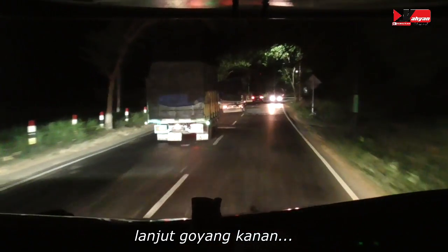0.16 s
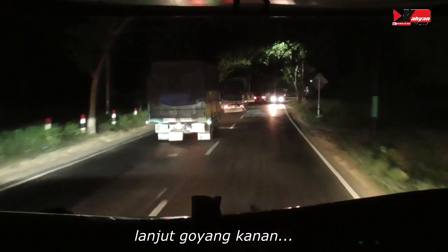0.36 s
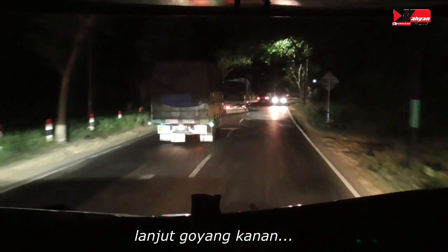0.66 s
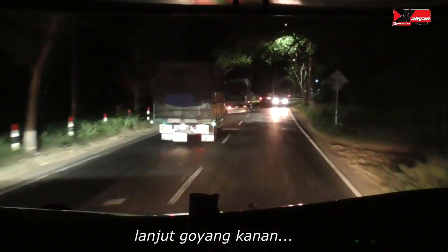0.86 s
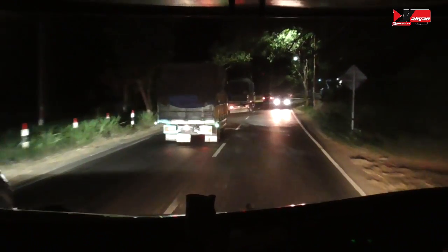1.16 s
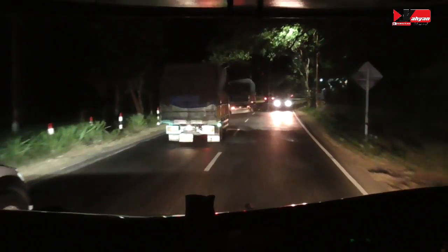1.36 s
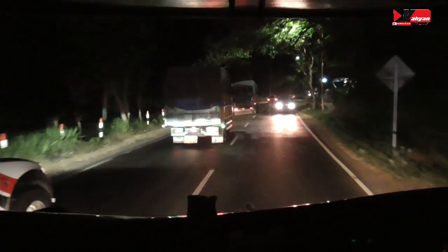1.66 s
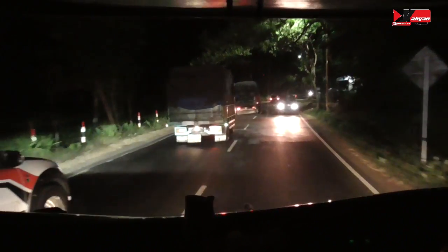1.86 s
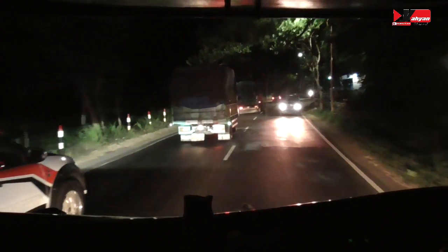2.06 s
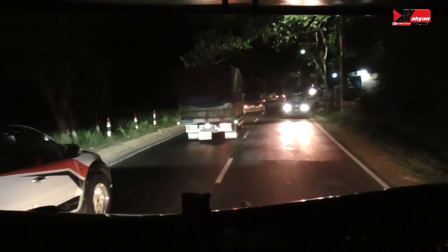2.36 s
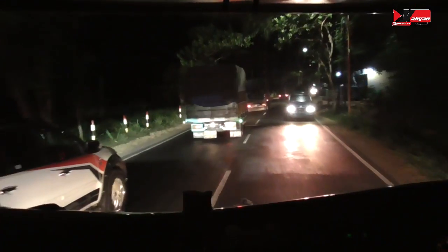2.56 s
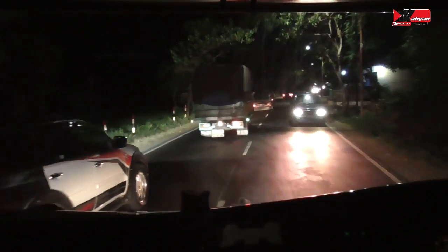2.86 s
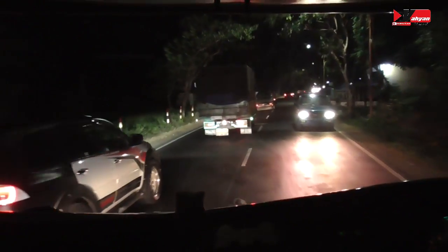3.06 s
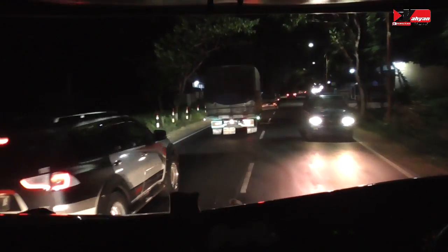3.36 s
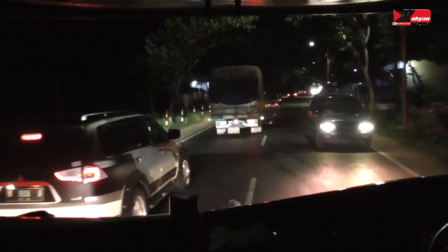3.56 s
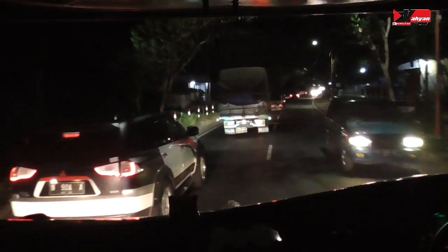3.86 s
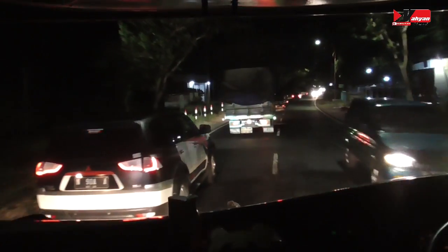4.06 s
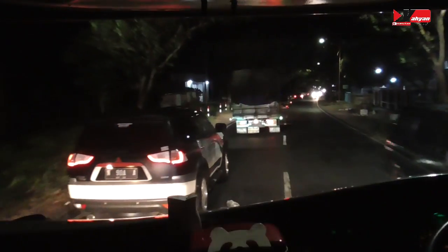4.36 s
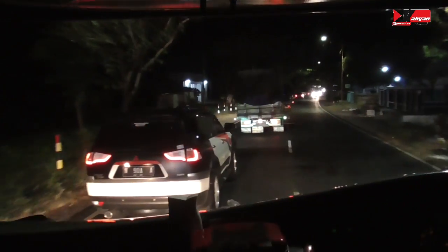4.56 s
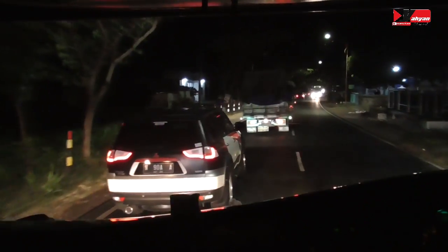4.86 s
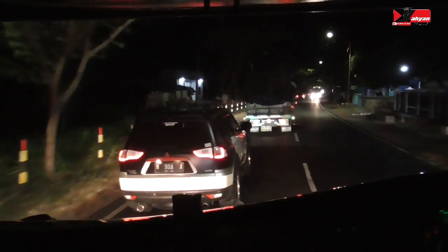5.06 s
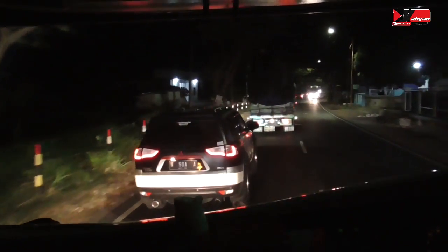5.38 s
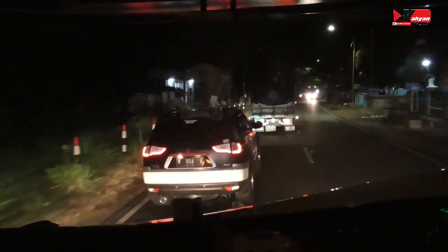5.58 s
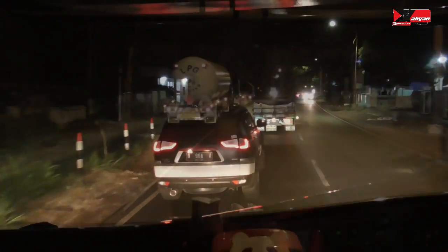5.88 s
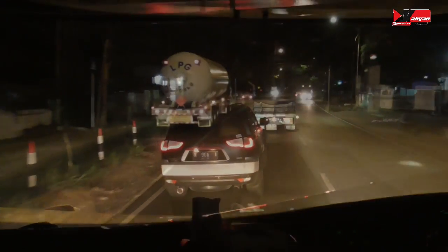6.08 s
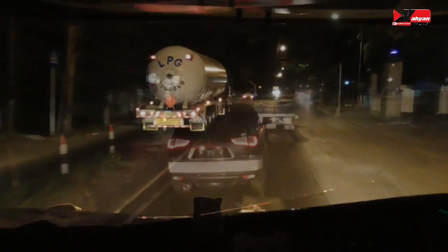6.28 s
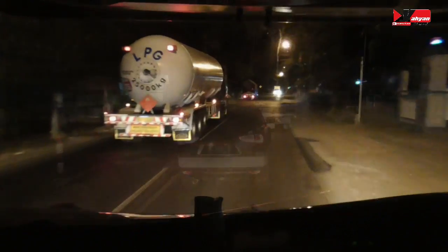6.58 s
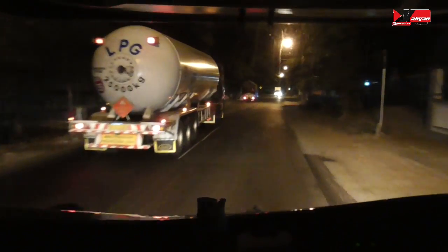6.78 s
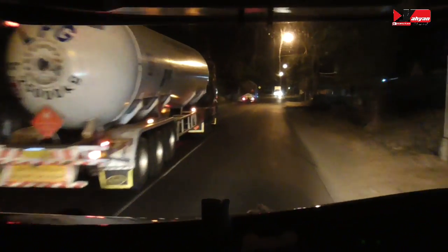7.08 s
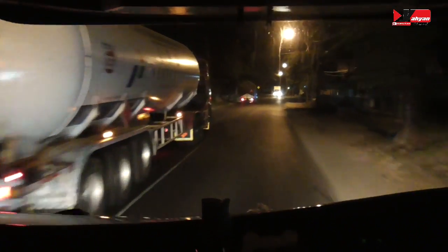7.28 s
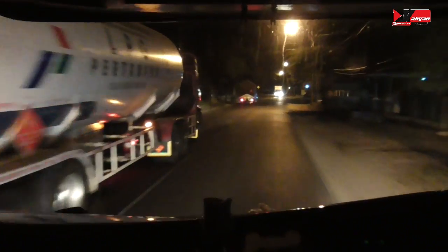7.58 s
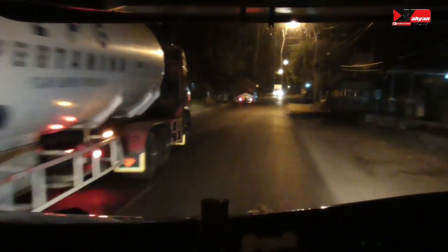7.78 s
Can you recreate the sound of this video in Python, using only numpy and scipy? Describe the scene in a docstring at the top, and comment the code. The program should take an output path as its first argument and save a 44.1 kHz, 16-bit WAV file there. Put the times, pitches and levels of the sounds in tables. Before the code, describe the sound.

Inside a large diesel coach moving at night, close to the microphone in the cab. A dark, heavy bed of road rumble and tyre roar runs throughout, with faint wavering engine and driveline hums and thin air hiss. An indicator relay clicks brightly from 0.25 s, roughly every 0.63 s to the end, with a much softer tock between clicks. Soft panel creaks and low floor booms occur in the first second; light trim knocks come near 1.7 s. The roar eases slightly from 2.5 to 4.3 s, with cloth rustles and small dry snaps around 3.5 and 4.5 s. Stronger rattles hit at 4.9 and 5.2 s, then more snaps. From 5.9 s the road noise swells, fullest around 7 to 7.4 s, with deep booms and frequent rattles, easing a little before it stops at 7.9 s, still under way.

```python
"""Road roar fills the cab of a coach at night: noise shaped by how hard the road shakes the floor.
The road roar grows louder towards the end. Gliding tones make the engine and driveline hum.
The indicator relay ticks and tocks by ringing its case; floor panels boom on single low notes.
Trim rattles, creaks and snaps are short knocks and rings spread by random cab reflections.
Air leaking past the seals and rustling cloth add fine, bright noise."""
import sys
import numpy as np
from scipy import signal
from scipy.fft import rfft, irfft
from scipy.io import wavfile
from scipy.ndimage import uniform_filter1d

SR = 44100
rng = np.random.default_rng(int(sys.argv[2]) if len(sys.argv) > 2 else 0)


def digitize_waveform(pressure):
    """Quantize a signal to 16-bit integers and store it at the path in sys.argv[1].

    Rows of a 2-D input are taken as channels; values are limited to [-1, 1].
    """
    field = np.atleast_2d(pressure).T
    bounded = np.clip(field, -1, 1)
    quanta = np.round(bounded * 32767).astype(np.int16)
    wavfile.write(sys.argv[1], SR, quanta)


N = 349713  # length in samples

# In all tables level_db is relative: a function may add a level shift for its whole layer.
# pan_db is left minus right.

# How hard the road shakes the floor: time_s, level_db
ROAD_SHAKING = [(0, 0.5), (.5, -1.5), (1.8, -2), (2.6, -3.5), (3.6, -4), (4.25, -3.5), (4.6, -1.5),
                (5.4, -2), (5.9, 2), (6.45, 5.5), (6.7, 6), (7, 7), (7.35, 7.5), (7.7, 6), (7.93, 4.5)]
# Tone colour of the road roar: pitch_hz, level_db (per Hz)
ROAR_COLOUR = [(8.8, -48.5), (15, -6), (49, -7), (121, -2), (224, -1.5), (256, -4), (293, -4.5),
               (357, -11.5), (399, -12.5), (679, -18), (886, -22.5), (969, -25.5), (1240, -28.5),
               (1500, -35.5), (1720, -45), (2100, -44.5), (3000, -62), (3900, -47), (6600, -120)]
# Bands lifted by the cab: pitch_hz, width_hz, lift_db
CAB_LIFTS = [(132.3, 63, 5), (163, 42, -1.5), (215, 18.4, 1.5), (466, 21, 3.5), (888, 146, 4)]
# Brief lifts and dips of the road roar and rumble: time_s, roar_lift_db, rumble_lift_db
ROAD_LIFTS = [(1.9, 14, 1), (4.55, 1, 4), (5.15, 5, 2.5), (6.4, -1, 3), (6.76, 10, -0.5), (6.96, 14, -0.5),
              (7.37, -14, -4)]
# Rumble against the shaking, and extra for its deepest part: time_s, level_db, deep_db
RUMBLE = [(0, 2, -8), (.9, 1.5, 0), (1.3, -1.5, -1), (2, 2, -3), (3, -4, 5), (3.9, -2.5, 3), (4.6, 1.5, -2),
          (5.4, -2, 5), (5.8, 2, -1), (6.7, -3.5, 2), (7.3, 1.5, -2), (7.93, -2, 4)]
# How strongly the wash (upper road noise) follows the shaking: pitch_hz, follow_db (per dB)
WASH_FOLLOWS = [(150, 1), (280, 0.83), (450, 1.19), (850, 0.91), (1300, 0.9), (2200, 1.22)]
# Surges and dips of the wash: time_s, lift_db
SURGES = [(5.95, 0.5), (6.15, -0.5), (6.66, 0), (6.82, -2.5), (6.93, 2), (7.2, -1.5), (7.45, 1.5),
          (7.6, -2.5), (7.72, 1.5), (7.81, -1)]
ROAR_FOLLOWS, RUMBLE_FOLLOWS, HISS_FOLLOWS = 0.88, 1, 0.69  # dB per dB of shaking
ROAR_LUMPS_DB, RUMBLE_LUMPS_DB, WASH_LUMPS_DB = -0.6, 1.6, 1.0  # random unevenness
ROAD_LIFT_S, SURGE_S = 0.053, 0.039  # time from the peak until the lift is down to 1/e

# Likeness of left and right noise: pitch_hz, likeness (1 is identical)
SAME = [(60, 0.92), (150, 1), (380, 0.88), (950, 0.72), (2380, 0.37), (5980, -0.21), (15000, -0.063)]
# Left-right balance of the noise: pitch_hz, pan_db
LEAN = [(60, 0), (180, -2), (550, -2.5), (1650, -1.5), (4970, 0), (15000, -3.5)]
# How far the left noise leads the right: pitch_hz, lead_rad
LEAD = [(0, 0), (2840, 0.0), (3700, -1.2), (6460, -4.5), (8960, -8), (11400, 0.5), (15200, -15)]

# Tone colour of the hiss: pitch_hz, level_db (per Hz)
HISS_COLOUR = [(900, -4), (1500, -5.5), (2300, -3), (2800, -6.5), (4500, -3), (5800, -7.5), (8000, -2),
               (11000, -3), (12800, -6), (14200, -11), (15200, -17), (15700, -30)]
# Cloth rustling: start_s, length_s, level_db, extra_below_crossover_db
RUSTLES = [(0, 0.13, -54, 2), (0.298, 0.18, -57, 2), (1.06, 0.32, -51, -4), (1.552, 0.4, -53, -2.5),
           (1.758, 0.32, -54, 3.5), (2.052, 0.22, -58, 2), (2.507, 0.46, -60.5, 6.5), (2.8, 0.57, -57, 5),
           (3.19, 0.72, -56, 5.5), (3.727, 0.55, -56, 3.5), (4.7, 0.77, -63.5, 12), (5.697, 0.44, -61.5, 9),
           (6.1, 0.37, -53.5, 4), (6.37, 0.29, -50, 6.5), (6.833, 0.38, -52, 3.5), (7.263, 0.38, -56.5, 8),
           (7.546, 0.41, -60.5, 4)]
SEALS_DB, SEALS_LOW_DB = -60, 6.5  # leaking air, and its extra below the crossover
RUSTLE_EDGE_S, CROSSOVER_HZ = 0.12, 5000

# Gliding engine whine: time_s, pitch_hz, level_db
ENGINE = [(0, 297.8, -8), (.35, 285, -36), (.45, 280, -44), (.6, 274.2, -33.5), (.95, 262, -39),
          (1.15, 258, -32.5), (1.4, 272, -40), (1.749, 297, -30.5), (1.902, 303, -37.5), (2.2, 308, -47),
          (2.499, 303.8, -48), (2.7, 302, -38.5), (2.9, 301, -45), (3.1, 300, -29.5), (3.3, 301, -41),
          (3.6, 303, -37), (3.7, 305, -40), (3.8, 309.4, -37.5), (4.2, 316.6, -37.5), (4.402, 289, -33),
          (4.65, 255.4, -42), (4.85, 238, -52), (5, 226, -32), (5.2, 207.7, -48)]
# Driveline hums, one list each, gliding from point to point: time_s, pitch_hz, level_db
HUMS = [
    [(0.76, 124.2, -21), (1.02, 127.7, -28.5), (1.1, 129.2, -25), (1.7, 126, -25), (1.95, 121.6, -29),
     (2.06, 115, -31), (2.22, 122, -28.5), (2.35, 113.7, -27.5), (2.5, 117.9, -27.5), (2.7, 118, -31),
     (2.92, 118, -27), (3.15, 114.3, -34.5)],
    [(3.05, 120.2, -37), (4.2, 121.6, -36), (5.2, 123.7, -33.5), (6.6, 125.2, -39)],
    [(2.4, 196.8, -32.5), (4, 199.4, -35)],
    [(4.7, 288.3, -35), (5.3, 287.3, -35.5), (5.45, 287, -29), (5.8, 286.5, -32.5), (5.92, 285.4, -34),
     (6.1, 286.8, -37.5), (6.4, 285, -28.5), (6.7, 285, -42)],
    [(6.1, 222, -37.5), (7.93, 225.4, -29)],
    [(0, 896, -54), (4.5, 907, -53.5)],
    [(.5, 223.4, -42), (2.35, 222.1, -38.5)],
    [(1.75, 112.4, -36), (2.3, 112.5, -32.5), (2.75, 111.8, -31)],
    [(3.3, 2320, -70), (3.6, 2355, -72), (4.2, 2310, -71)],
]
# Unsteadiness of each driveline hum: pitch_waver_share, throb_db
UNSTEADY = [(0.0052, 1.5), (0.011, 3), (0.0027, 0.5), (0.004, 2.5), (0.0078, 3), (0.01122, 4), (0.0089, 2),
            (.004, -0.5), (0.0099, 6.5)]

# Soft creaks of the body panels: start_s, peak_db, panel_name
CREAKS = [(0, -45, "high"), (0.244, -37, "low"), (.36, -40.5, "high"), (.465, -36.5, "low"),
          (.575, -43, "low"), (.9, -39, "low"), (.9, -48, "top"), (1.16, -48, "high"), (1.85, -52, "high"),
          (1.939, -54, "high"), (6.53, -44, "high"), (7.42, -35, "low")]
# What each creaking panel rings with, by name: pitch_hz, width_hz, t60_s (time to fall 60 dB)
PANELS = {"low": (1304, 100, 0.055), "top": (1970, 120, .06), "high": (1770, 580, 0.36)}

# Brief booms of the floor: peak_s, level_db, pitch_hz
BOOMS = [(.1, -23.5, 144), (0.177, -25.5, 232), (0.602, -21.5, 139.2), (0.718, -25.5, 135),
         (0.578, -24, 114.7), (4.151, -30, 119), (4.378, -26.5, 113), (4.579, -24, 122.5),
         (4.809, -25, 126.8), (5, -29, 127.8), (5.521, -30, 122), (5.721, -29, 123.6), (6.01, -24.5, 130.8),
         (6.43, -20, 225), (6.497, -26, 122.3), (6.66, -24, 226.6), (7, -19, 226), (7.05, -18, 123),
         (7.3, -21.5, 137), (7.299, -23.5, 171), (7.401, -20, 78), (7.881, -25.5, 231)]
BOOM_S = 0.073  # time from the peak until the boom is down to 1/e

# Knocks of loose trim: time_s, level_db, low_part_db (below about 6.7 kHz),
# body_db (dull body near 740 Hz), pan_db, t60_s
RATTLES = [(0.242, -39, 6, -10, 2, .1), (.4638, -44, 4, -6, -2, .1), (1.1308, -43, -16, -12, -2, 0.11),
           (1.6665, -34.5, -6, -6, -1, 0.14), (1.6824, -37, -10, -19, -3, 0.17),
           (3.062, -40, -3, -10, -1, 0.36), (3.14, -45, 8, -12, 0, .1), (3.465, -42, 8, -10, 0, .12),
           (3.563, -41, 7, -10, 0, .08), (3.605, -45, 6, -10, 0, 0.068), (3.648, -42, 7, -8, 0, .1),
           (3.81, -47, 7, -10, 0, .1), (3.948, -39, 10, -8, 0, 0.1), (4.0831, -40.5, -17, -14, -2.5, 0.1),
           (4.9188, -24.5, -0.5, -4, -2, 0.18), (5.1, -46, -8, -12, 0, .1), (5.1776, -25, -2, -12, 0, 0.14),
           (5.1834, -23.5, -3, -3, -3, 0.19), (5.375, -42, 5, -2, -1, 0.22),
           (5.728, -34.5, -7, -13, -1, 0.28), (5.7616, -35, 5, -1, -2, 0.095),
           (5.9431, -31, -8, -7, 1, 0.15), (6.1236, -32, -11, 0, -1, 0.23),
           (6.2857, -25, -18, -9, -2, 0.076), (6.659, -40, 0, 6, 1, 0.17), (6.913, -38, -17, -6, .5, 0.16),
           (7.0499, -34, -3, 4.5, -1, 0.071), (7.208, -42, -15, 3, -1, 0.24),
           (7.263, -34.5, -2, -2, -1, .12), (7.3744, -37.5, -6, 10, -2, 0.38), (7.668, -43, -10, 1, 2, .3),
           (7.8635, -41, -4.5, -5, -1, .17)]
# Tone colour of the loose trim: pitch_hz, level_db (per Hz)
TRIM_COLOUR = [(1470, -37), (2500, -9), (3140, -5), (3450, 1), (5200, -6), (8170, -2.5), (12200, -8.5),
               (14600, -18), (15500, -39)]

# The relay closes; two closings overlap near 5.87 s: time_s, level_db, pan_db
TICKS = [(.2548, -29, -2), (.880, -28, -3), (1.506, -27, -1), (2.130, -26.5, 0), (2.755, -28, -3),
         (3.38, -27.5, -2), (4.005, -26, -2), (4.63, -28, -1), (5.255, -26.5, -2), (5.861, -33.5, -8),
         (5.880, -29.5, -2), (6.485, -26, -2), (7.107, -29, -4), (7.732, -30.5, -6)]
# The relay opens in between: time_s, level_db
TOCKS = [(0.579, -46.5), (1.205, -47), (1.8298, -46.5), (2.454, -46.5), (3.0798, -47), (3.7049, -46.5),
         (4.33, -45.5), (4.954, -47), (5.5556, -46), (6.182, -50), (6.204, -49.5), (6.783, -46.5),
         (7.432, -46.5)]
# Rings of the relay case: pitch_hz, width_hz (before added damping), closing_db, opening_db
RELAY = [(3270, 90, -16, -4), (3480, 60, -8, -4), (3652, 45, 1, -9), (3750, 45, -8, 1), (3865, 60, -4, -9),
         (4030, 50, -11, -7), (4200, 55, -8, -10), (4393, 50, -5.5, -14), (4607, 50, -9, -14),
         (4867, 70, -15, -11), (2500, 60, -32, -7), (2750, 60, -33, -9), (3030, 90, -25, -11),
         (5250, 300, -23, -19), (6500, 250, -32, -7), (7250, 350, -22, -9), (8200, 700, -20, -11),
         (9700, 700, -24, -11), (11350, 500, -25, -17), (11925, 90, -21, -12), (12117, 90, -22, -10)]
# The armature chatters against its stop: delay_ms, closing_db, opening_db
CHATTER = [(0, 7, 3), (4.07, -18.5, -6), (8.09, -2, -5), (11.88, 0, -5), (16, -2, 3), (20, 3, -15),
           (23.4, -9, -8), (28.1, -2, -4), (31.9, -7, -16), (34.9, -14, -8)]
# How far the left relay sound leads the right: pitch_hz, lead_rad
RELAY_LEAD = [(0, 8), (4400, -0.7), (6400, -3), (9500, -10), (15200, -14)]
OPENING_PAN_DB, OPENING_CAB_DB = -2.5, 3.5

# Dry snaps close to the microphone: time_s, level_db, pan_db
SNAPS = [(1.2815, -36, 7), (3.548, -34, 0.0), (3.6194, -42, 4), (4.4925, -27.5, 3), (4.769, -28.5, 0.5),
         (5.1338, -31, 1), (5.3214, -37, 1), (5.4849, -38, 3), (5.64, -45, -8)]
# Tone colour of a snap: pitch_hz, level_db
SNAP_COLOUR = [(500, -20), (1500, -5), (3000, 5), (6000, -5), (10000, -5), (15500, -21)]

EDGE_HZ = 15650  # top of the recorder's range


def gain_of(db):
    """Turns decibels into a factor."""
    return 10 ** (np.asarray(db) / 20)


def evened(x):
    """Scales to an rms (average strength) of 1."""
    return x / np.sqrt(np.mean(x ** 2) + 1e-20)


def read(points, hz):
    """Reads a table of values over pitch, with straight lines on a log pitch scale."""
    f, value = np.transpose(points)
    return np.interp(np.log(hz + 1), np.log(f + 1), value)


def add(mix, s, sound, pan_db):
    """Mixes in a two-channel sound at time s, cutting whatever runs past the end."""
    part = mix[:, round(s * SR):][:, :sound.shape[1]]
    part += sound[:, :part.shape[1]] * gain_of([[pan_db / 2], [-pan_db / 2]])


def drift(size, width):
    """Slow random wandering of rms 1: noise averaged twice over width points."""
    once = uniform_filter1d(rng.standard_normal(size), width)
    return evened(uniform_filter1d(once, width))


def shaking(t):
    """How hard the road shakes the floor, in dB."""
    return np.interp(t, *np.transpose(ROAD_SHAKING))


def brief_lifts(rows, t, width_s):
    """Adds up bell-shaped lifts and dips over time, one result for each lift column."""
    s, *lifts = np.transpose(rows)
    return np.array(lifts) @ np.exp(-((t - s[:, None]) / width_s) ** 2)


def field(field_db, size, patchy_db):
    """Stereo noise from random short-time spectra; field_db(hz, t) gives their level in dB."""
    hop = size // 4
    hz = np.fft.rfftfreq(size, 1 / SR)
    t = np.arange(N // hop + 5) * hop / SR
    a, b, c, d, patches = rng.standard_normal((len(t), len(hz), 5)).T
    # neighbouring pitches and moments share a patch of louder or softer noise
    patches = evened(uniform_filter1d(uniform_filter1d(patches, 6, 0), 8, 1))
    same = np.clip(read(SAME, hz), -1, 1)[:, None]
    left, other = a + 1j * b, c + 1j * d
    right = same * left + np.sqrt(1 - same ** 2) * other
    right = right * np.exp(-1j * read(LEAD, hz))[:, None]
    lean = gain_of(read(LEAN, hz) / 2)[:, None]
    level = gain_of(field_db(hz[:, None], t) + patchy_db * patches)
    spectra = np.array([left * lean, right / lean]) * level
    return signal.istft(spectra, nperseg=size, noverlap=size - hop)[1][:, :N]


def road(patchy_db=0.66, trim_db=-31.5, roar_db=2.5, rumble_db=-2.0, wash_db=-1.0):
    """Tyres and engine shake the floor: rumble, roar and wash share the pitch range."""
    def shape(hz, t):
        roar_lift, rumble_lift = brief_lifts(ROAD_LIFTS, t, ROAD_LIFT_S)
        roar = roar_db + ROAR_FOLLOWS * shaking(t) + roar_lift
        roar = roar + ROAR_LUMPS_DB * drift(len(t), width=8)

        rumble = rumble_db + RUMBLE_FOLLOWS * shaking(t) + rumble_lift
        rumble = rumble + RUMBLE_LUMPS_DB * drift(len(t), width=8)
        s, level, deep = np.transpose(RUMBLE)
        deepest = 1 / (1 + (hz / 71.0) ** 6)
        rumble = rumble + np.interp(t, s, level) + np.interp(t, s, deep) * deepest

        surge, = brief_lifts(SURGES, t, SURGE_S)
        surge = surge + WASH_LUMPS_DB * drift(len(t), width=6)
        surge_range = 1 / (1 + (290.0 / (hz + 1)) ** 4)
        wash = wash_db + read(WASH_FOLLOWS, hz) * shaking(t) + surge * surge_range

        cab_lift = sum(db / (1 + (2 * (hz - f) / w) ** 2) for f, w, db in CAB_LIFTS)
        low = 1 / (1 + (hz / 138.0) ** 4)
        high = 1 / (1 + (170.0 / (hz + 1)) ** 4)
        level = low * rumble + high * wash + (1 - low - high) * roar
        return read(ROAR_COLOUR, hz) + cab_lift + level + trim_db
    return field(shape, size=2048, patchy_db=patchy_db)


def hiss(flicker_db=0.5, trim_db=-14.5):
    """Air leaks past the seals and cloth rustles: bright noise that flickers across the treble."""
    def shape(hz, t):
        under = 1 / (1 + (hz / CROSSOVER_HZ) ** 4)
        seals_db = SEALS_DB + HISS_FOLLOWS * shaking(t) + under * SEALS_LOW_DB
        power = gain_of(2 * seals_db)  # doubled dB turns strength into power
        for s, length, db, low_db in RUSTLES:
            swell = np.clip(np.minimum(t - s, s + length - t) / RUSTLE_EDGE_S, 0, 1)
            power = power + swell ** 2 * gain_of(2 * (db + under * low_db))
        flicker = flicker_db * drift(len(t), width=3)
        return read(HISS_COLOUR, hz) + 10 * np.log10(power) + flicker + trim_db
    return field(shape, size=512, patchy_db=0.6)


def hum(hz, level_db, waver, throb_db, throb_s):
    """A near-pure tone that wavers a little in pitch and throbs in strength."""
    pitch = hz * (1 + waver * drift(len(hz), width=600))
    turns = np.cumsum(pitch) / SR + rng.random()
    tone = np.sqrt(2) * np.sin(2 * np.pi * turns)
    tone *= gain_of(level_db + throb_db * drift(len(hz), round(throb_s * SR)))
    tone *= signal.windows.tukey(len(hz), 0.15)  # fades both ends
    return np.array([tone, tone])


def hums(pan_db=-1.5, throb_s=0.037):
    """The engine whine and driveline hums glide in pitch and level between table points."""
    out = np.zeros((2, N))
    for rows, (waver, throb_db) in zip([ENGINE] + HUMS, [(0.002, 1.3)] + UNSTEADY):
        s, hz, db = np.transpose(rows)
        t = np.arange(s[0], s[-1], 1 / SR)
        tone = hum(np.interp(t, s, hz), np.interp(t, s, db), waver, throb_db, throb_s)
        add(out, s[0], tone, pan_db)
    return out


def cab(t60, rise_s, same, hold_s=0, dense=0.15):
    """One random path through the cab: reflections that build up, hold and die away."""
    t = np.arange(9000) / SR
    # dense is the share of samples that carry a reflection
    left, other = rng.standard_normal((2, len(t))) * (rng.random((2, len(t))) < dense)
    same = np.clip(same, -1, 1)
    tail = np.array([left, same * left + np.sqrt(1 - same ** 2) * other])
    build_up = 1 - np.exp(-t / rise_s)
    die_away = gain_of(-60 * np.maximum(t - hold_s, 0) / t60)
    tail = tail * build_up * die_away
    return tail / np.linalg.norm(tail[0])


def creaks():
    """A panel slips and rings in one dull band, spread by the cab."""
    out = np.zeros((2, N))
    t = np.arange(1500) / SR
    for s, db, panel in CREAKS:
        hz, width, t60 = PANELS[panel]
        decay = np.exp(-np.pi * width * t)
        ring = decay * (1 - decay) * np.sin(2 * np.pi * hz * t)
        path = cab(t60, rise_s=0.0015, same=0.84, hold_s=0.018)
        creak = signal.fftconvolve(path, ring[None], axes=1)
        add(out, s, gain_of(db) * creak / abs(creak).max(), -1.5)
    return out


def booms(pan_db=-2.0):
    """A floor panel swells up and dies away on one low note."""
    out = np.zeros((2, N))
    t = np.arange(-3 * BOOM_S, 3 * BOOM_S, 1 / SR)
    for s, db, hz in BOOMS:
        swell = gain_of(db) * np.sqrt(2) * np.exp(-(t / BOOM_S) ** 2)
        boom = swell * np.sin(2 * np.pi * (hz * t + rng.random()))
        boom = boom[t + s >= 0]  # drop what falls before the start
        add(out, max(s + t[0], 0), np.array([boom, boom]), pan_db)
    return out


def coloured(path, slow_path, low_db, body_db):
    """Gives a knock the colour of the trim, a set level below 6.7 kHz and a dull panel body."""
    padded = np.pad(path, ((0, 0), (40, 0)))
    size = padded.shape[1]
    hz = np.fft.rfftfreq(size, 1 / SR)
    bright = gain_of(read(TRIM_COLOUR, np.maximum(hz, 3000)))
    low_part = gain_of(low_db / (1 + (hz / 6700.0) ** 8))
    bass_cut = np.sqrt(1 + (430.0 / (hz + 1)) ** 4)
    knock = irfft(rfft(padded) * bright * low_part / bass_cut, size)
    body = irfft(rfft(slow_path, size) / (1 + ((hz - 740.0) / 380.0) ** 2), size)
    return knock / abs(knock).max() + gain_of(body_db) * body / abs(body).max()


def rattles(rattle_db=6.0):
    """Loose trim knocks; the cab spreads each knock so the two ports hear it only partly alike."""
    out = np.zeros((2, N))
    for s, db, low_db, body_db, pan_db, t60 in RATTLES:
        path = cab(t60, rise_s=0.00016, same=0.43, hold_s=0.0076, dense=0.07)
        slow_path = cab(t60, rise_s=0.0025, same=0.64, hold_s=0.01)
        knock = coloured(path, slow_path, low_db, body_db)
        add(out, s - 0.001, gain_of(db + rattle_db) * knock, pan_db)
    return out


def ports(x):
    """The right port hears the sound with its phase turned, by pitch."""
    hz = np.fft.rfftfreq(x.shape[1], 1 / SR)
    right = irfft(rfft(x[1]) * np.exp(-1j * read(RELAY_LEAD, hz)), x.shape[1])
    return np.array([x[0], right])


def relay(events, column, damping_hz, cab_db, level_db,
          uneven_db=0.5, t60=0.14, hold_s=0.02, direct_hz=5440.0):
    """The armature's touches ring the case; the cab spreads each event a little differently."""
    t = np.arange(3000) / SR
    out = np.zeros((2, N))
    modes = []
    for k, row in enumerate(RELAY):
        width = row[1] + damping_hz
        decay = width * np.exp(-np.pi * width * t)
        modes.append(gain_of(row[column]) * decay * np.sin(2 * np.pi * row[0] * t + k))
    # the armature lands softly: little energy between the modes
    modes = np.array(modes) * (1 - np.exp(-t / 0.0003)) ** 2
    # the direct touches are duller than the spread sound
    duller = 1 / (1 + (np.array(RELAY)[:, 0] / direct_hz) ** 4)
    steady = cab(t60, rise_s=0.0033, same=0.56, hold_s=hold_s, dense=0.022)
    for s, db, pan_db in events:
        fresh = cab(t60, rise_s=0.0013, same=0.12, hold_s=hold_s, dense=0.03)
        path = gain_of(cab_db) * (steady + 1.3 * fresh)
        struck = gain_of(uneven_db * rng.standard_normal(len(RELAY)))
        ring, direct = struck @ modes, (struck * duller) @ modes
        touches = np.zeros_like(path)
        for row in CHATTER:
            touch_db = row[column - 1] + uneven_db * rng.standard_normal()
            touches[:, round(row[0] * SR / 1000)] += gain_of(touch_db)
        sound = signal.fftconvolve(path, ring[None], axes=1)
        sound = sound + signal.fftconvolve(touches, direct[None], axes=1)
        add(out, s, gain_of(db + level_db) * evened(sound), pan_db)
    return ports(out)


def snaps(level_db=5.0, t60=0.0054):
    """Plastic cracks close to the microphone: a direct click and a very short tail."""
    out = np.zeros((2, N))
    for s, db, pan_db in SNAPS:
        path = np.pad(cab(t60, rise_s=0.0001, same=0.9), ((0, 0), (40, 0)))
        path[:, 40] += 1.2  # the direct crack
        hz = np.fft.rfftfreq(path.shape[1], 1 / SR)
        crack = irfft(rfft(path) * gain_of(read(SNAP_COLOUR, hz)), path.shape[1])
        add(out, s - 0.001, gain_of(db + level_db) * crack / abs(crack).max(), pan_db)
    return out


def scene():
    """Adds up everything heard in the cab."""
    ticks = relay(TICKS, column=2, damping_hz=2.4, cab_db=5.0, level_db=-15.0)
    openings = [(*row, OPENING_PAN_DB) for row in TOCKS]
    tocks = relay(openings, column=3, damping_hz=22.0, cab_db=OPENING_CAB_DB,
                  level_db=-7.0, hold_s=0.019)
    steady_sounds = road() + hiss() + hums()
    return steady_sounds + creaks() + booms() + rattles() + ticks + tocks + snaps()


def record(dry):
    """The recorder's band limit: a low-pass filter removes the highest treble."""
    low_pass = signal.firwin(511, EDGE_HZ, window=("kaiser", 9), fs=SR)
    return signal.oaconvolve(dry, low_pass[None], "same")


dry = scene()
out = record(dry)
digitize_waveform(out)
```